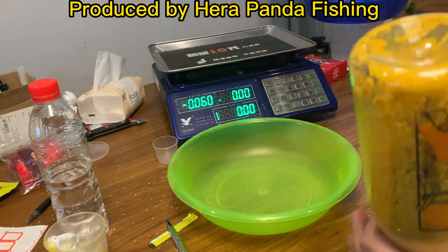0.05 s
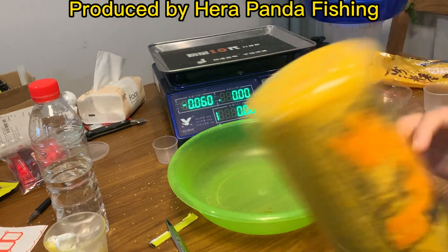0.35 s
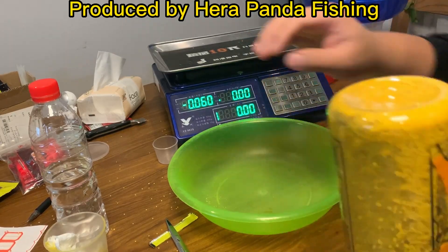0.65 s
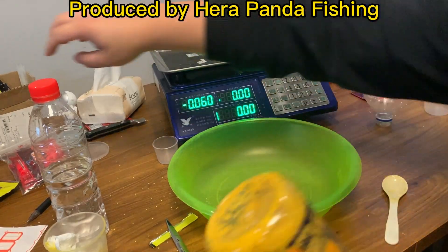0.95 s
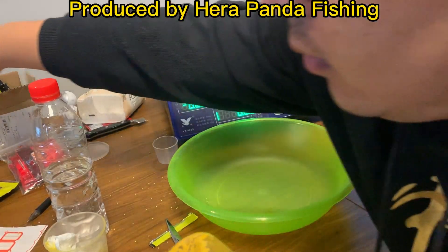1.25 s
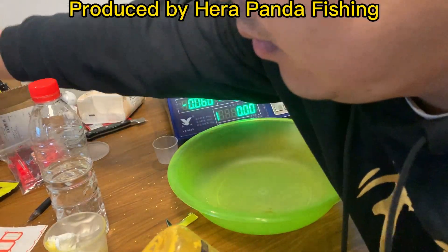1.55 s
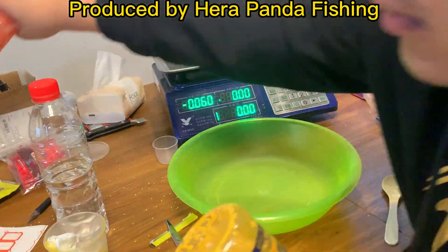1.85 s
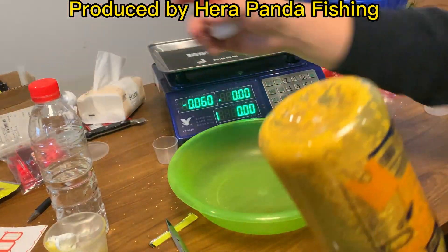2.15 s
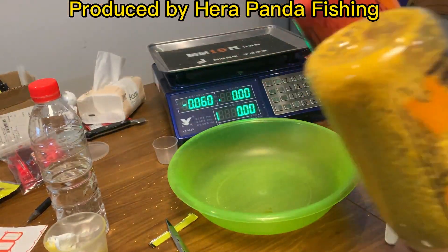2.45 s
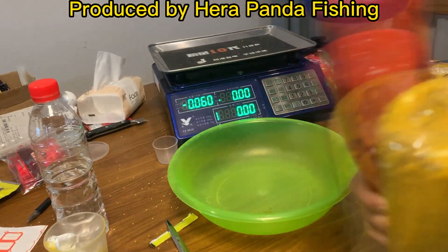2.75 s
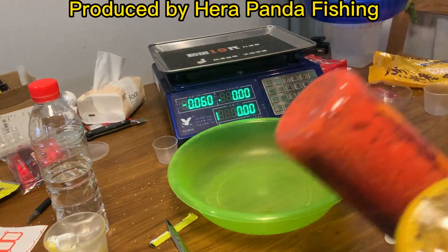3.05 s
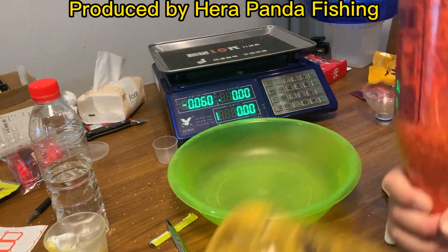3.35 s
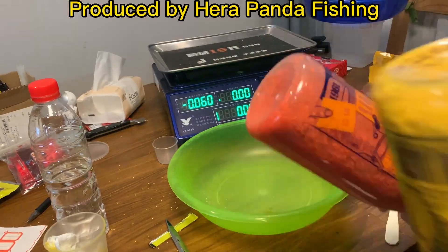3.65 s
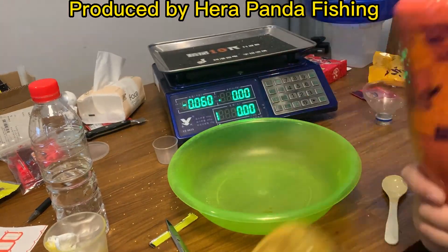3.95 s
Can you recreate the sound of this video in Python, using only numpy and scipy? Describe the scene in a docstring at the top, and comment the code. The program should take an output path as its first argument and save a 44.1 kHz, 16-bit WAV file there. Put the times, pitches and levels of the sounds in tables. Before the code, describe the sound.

Fine grain is shaken in plastic jars, swishing in quick strokes from about 0.3 to 1.1 seconds. A lull follows, with soft hand bumps and a sleeve rustle over faint room rumble. The swishing returns around 2.4 seconds, with a thump near 2.7. From 3.2 to 4 seconds the shaking is harder and closer, the packed grain landing in about a dozen loud, sharp, hollow knocks.

```python
"""Shaking jars of grain

Two plastic jars of fine grain are shaken by hand over a table in a small room. At first the grain
swishes from end to end in showers of tiny impacts; then a jar is shaken hard and the packed grain
lands in knocks of falling pitch that ring the jar. Between the shakes a sleeve rustles and a hand
bumps about, over a low room rumble."""
import sys
import numpy as np
from scipy import signal
from scipy.fft import rfft, irfft
from scipy.io import wavfile
from scipy.ndimage import uniform_filter1d

SR = 44100
rng = np.random.default_rng(int(sys.argv[2]) if len(sys.argv) > 2 else 0)


def output_pcm(signal):
    """Save a mono or channel-first signal as 16-bit PCM at the path in sys.argv[1].

    Samples are clipped to [-1, 1] before scaling.
    """
    pcm = np.clip(np.atleast_2d(signal).T, -1, 1) * 32767
    wavfile.write(sys.argv[1], SR, np.round(pcm).astype(np.int16))


N = 176400
T, HZ = np.arange(N) / SR, np.fft.rfftfreq(N, 1 / SR)


def amp(db):
    """Decibels to gain."""
    return 10 ** (np.asarray(db) / 20)


def unit(x):
    """Scales to rms 1."""
    return x / np.sqrt(np.mean(x ** 2) + 1e-20)


def curve(points, hz=HZ):
    """Reads breakpoints on a log-frequency axis."""
    f, value = np.transpose(points)
    return np.interp(np.log(hz + 1), np.log(f + 1), value)


def fader(points):
    """Gain over time from (t/s, level/dB) breakpoints."""
    return amp(np.interp(T, *np.transpose(points)))


def swell(at, half_width):
    """A bell-shaped envelope."""
    return np.exp(-np.minimum(((T - at) / half_width) ** 2, 50))


def pan(db):
    """Left and right gains, the left db above the right."""
    return amp(np.array([[db], [-db]]) / 2)


def band(hz, octaves):
    """The EQ curve of a soft resonance."""
    return 1 / (1 + (np.log2((HZ + 1) / hz) / octaves) ** 2) ** 2


def low_pass(x, hz):
    """A steep high cut."""
    taps = signal.firwin(201, hz, window=("kaiser", 8), fs=SR)
    return signal.oaconvolve(x, taps[None], "same")


def roll_off(x, hz):
    """A gentle high cut."""
    return irfft(rfft(x) / (1 + (HZ / hz) ** 4), N)


def wander(hz):
    """Random motion slower than about hz."""
    return unit(roll_off(rng.standard_normal(N), hz))


def noise():
    """Two unrelated white noises."""
    return rng.standard_normal((2, N))


def grains(per_second=8000, spread_db=0.3):
    """Two unrelated showers of tiny impacts of uneven size."""
    impacts = noise() * (rng.random((2, N)) < per_second / SR)
    return impacts * amp(spread_db * np.minimum(rng.exponential(1, (2, N)), 4))


def stereo(source, eq, coherence, lag_s=0):
    """Blends two unrelated signals into an equalised stereo image, the left side lag_s late."""
    a, b = rfft(source)
    shared = np.clip(curve(coherence), 0, 1)
    left = a * np.exp(-2j * np.pi * HZ * lag_s)
    right = shared * a + np.sqrt(1 - shared ** 2) * b
    return unit(irfft(np.array([left, right]) * eq, N))


# Fader rides of the rumble and of the soft room and handling noise: t/s, level/dB
RUMBLE_RIDE = [(0, -55), (.6, -52), (1.2, -49.5), (2.2, -52), (3.05, -55.5), (3.13, -82), (4, -102)]
AIR_RIDE = [(0, -62), (.6, -61), (1.3, -58.5), (1.95, -62), (2.3, -57.5), (2.9, -50.5), (3.3, -51),
            (4, -55.5)]
# Their tone: f/Hz, level/dB
RUMBLE_EQ = [(15, -7.5), (35, -31.5), (57, 6), (75, -9), (110, -7.5), (170, -8.5), (300, -22.5), (800, -69)]
AIR_EQ = [(60, -50), (170, 5), (350, 6.5), (600, 2), (1000, 0.5), (2000, -9), (4000, -16.5), (15000, -80)]
# Stereo image of room tone and handling: f/Hz, left-right coherence
BED_IMAGE = [(50, 0.99), (500, 0.58), (1500, 0.12), (5000, 0.1)]


def room_tone():
    """The bed: low rumble under soft room noise."""
    rumble = fader(RUMBLE_RIDE) * stereo(noise(), amp(curve(RUMBLE_EQ)), BED_IMAGE)
    air = fader(AIR_RIDE) * stereo(noise(), amp(curve(AIR_EQ)), BED_IMAGE)
    return rumble + air


# Decay of the small room: f/Hz, T60/s
REVERB_DECAY = [(100, 0.18), (700, 0.054), (3000, 0.17), (8000, 0.059), (16000, 0.19)]
# Reverb send EQ: f/Hz, level/dB
REVERB_EQ = [(100, -6), (700, -9.5), (2000, -10), (6000, -4), (15000, -40)]


def reverb(x):
    """The room's short diffuse tail, each band dying at its own speed."""
    hz, t, bands = signal.stft(rng.standard_normal((2, SR // 2)), SR, nperseg=256)
    decay = amp(-60 * t / curve(REVERB_DECAY, hz)[:, None])
    tail = signal.istft(bands * decay, SR, nperseg=256)[1]
    tail *= np.clip(np.arange(tail.shape[1]) / SR / 0.00037 - 1, 0, 1)  # pre-delay, then fade-in
    send = irfft(rfft(x) * amp(curve(REVERB_EQ)), N)
    return signal.fftconvolve(send, tail / np.linalg.norm(tail[0]), axes=1)[:, :N]


# Hum of the jar's hollow: t/s, level/dB
HUM_RIDE = [(0, -73), (2.55, -63.5), (2.8, -59.5), (3.3, -66), (4, -55.5)]
# Soft bumps of hand and arm: t/s, level/dB, half width/s, f/Hz, rustle/dB
HAND_BUMPS = [(1.258, -43, .027, 400, -48), (1.305, -48, .06, 280, -53), (1.65, -39, .036, 135, -59),
              (1.65, -46, .036, 420, -66), (2.075, -48, .026, 290, -55)]
# Tone of the sleeve: f/Hz, level/dB
SLEEVE_EQ = [(30, -43), (100, 10), (300, -7.5), (550, -5.5), (750, -6), (1200, -6), (2500, -12),
             (6000, -23.5), (15000, -33)]


def handling():
    """Dull bumps with a rustle of sleeve, over the faint hum of the held jar's hollow."""
    foley = fader(HUM_RIDE) * stereo(noise(), band(hz=287.2, octaves=0.034), BED_IMAGE)
    sleeve = stereo(grains(), amp(curve(SLEEVE_EQ)), BED_IMAGE)
    for at, db, width, hz, rustle_db in HAND_BUMPS:
        bump = stereo(noise(), band(hz, octaves=0.45), BED_IMAGE)
        foley += swell(at, width) * (amp(db) * bump + amp(rustle_db) * sleeve)
    return foley


# Thin whistles of powder: t/s, level/dB, half width/s, f/Hz, glide/(Hz/s)
POWDER_WHISTLES = [(1.143, -60.5, 0.11, 10700, -3000), (2.242, -67, 0.17, 10320, 1505.5)]


def powder_whistles():
    """Powder sliding in a tilted jar sings a narrow, gliding hiss."""
    hiss = np.zeros(N)
    for at, db, width, hz, glide in POWDER_WHISTLES:
        phase = 2 * np.pi * np.cumsum(hz + glide * (T - at)) / SR
        hiss += amp(db) * swell(at, width) * wander(hz=450) * np.sin(phase)
    return hiss


# Rubs on the plastic: t/s, level/dB, half width/s, f/Hz
PLASTIC_RUBS = [(.44, -38, .014, 2950), (.543, -37, .012, 4530), (.816, -42, .012, 1990),
                (1.89, -67, .06, 1012), (1.86, -76, .12, 1658)]


def plastic_rubs():
    """Rubbed plastic rings briefly on one narrow note."""
    return sum(amp(db) * swell(at, width) * wander(1 / width) * np.sin(2 * np.pi * hz * T)
               for at, db, width, hz in PLASTIC_RUBS)


def shifting_resonances(x, depth_db=2.2):
    """The jar's narrow resonances change at random from stroke to stroke."""
    bands = signal.stft(x, nperseg=512)[2]
    ripple = uniform_filter1d(rng.standard_normal(bands.shape[1:]), size=3, axis=0)  # across frequency
    ripple = uniform_filter1d(ripple, size=14, axis=1)  # across time
    return unit(signal.istft(bands * amp(depth_db * unit(ripple)), nperseg=512)[1][:, :N])


# Grain trickling as the jars tilt: t/s, level/dB
TRICKLE_RIDE = [(0, -63), (.12, -64), (.19, -73), (.33, -55.5), (.85, -57.5), (1.15, -63), (1.28, -65.5),
                (1.50, -86.5), (1.57, -74.5), (1.66, -70), (1.72, -75), (1.83, -73.5), (1.96, -87),
                (2.2, -64), (2.33, -64.5), (2.8, -46), (3.12, -59.5), (3.45, -58.5), (3.57, -61.5),
                (3.78, -62.5), (4, -56.5)]
# Loose grain sliding into the jar's end: t/s, level/dB, half width/s, low-mid boost/dB
GRAIN_SWISHES = [(.085, -57.5, 0.015, 10), (0.232, -53.5, 0.015, 1.5), (0.299, -52.5, 0.015, 7.5),
                 (0.348, -38, 0.014, -5), (0.368, -35, 0.0084, -6), (0.441, -28, 0.012, -3.5),
                 (0.539, -29, 0.0088, -3), (0.627, -28.5, 0.01, -2), (0.729, -32, 0.013, -1),
                 (0.78, -52, 0.0083, 19.5), (0.817, -31.5, 0.01, 1.5), (0.928, -36.5, 0.015, -2),
                 (1.05, -40, 0.011, 0), (1.749, -59, 0.0022, 8), (2.401, -52.5, 0.0092, 23),
                 (2.456, -46, 0.028, 12.5), (2.519, -35.5, 0.018, -2.5), (2.625, -34, 0.023, -13),
                 (2.702, -31, 0.026, -0.5), (2.804, -31, 0.012, -29), (2.886, -29.5, 0.017, -2.5),
                 (2.983, -31.5, 0.017, -13), (3.059, -34.5, 0.022, -5.5)]
# Clumps slapping the plastic: t/s, level/dB
CLUMP_SLAPS = [(0.22, -49.5), (.287, -48), (2.361, -50), (2.613, -29), (2.796, -30), (2.813, -23.5),
               (2.873, -34), (2.971, -29), (2.990, -41), (3.068, -24)]
# Tone of the shower: f/Hz, level/dB
SWISH_EQ = [(100, -66), (300, -5.5), (700, -6.5), (1400, -6), (2700, -2.5), (4500, 0.5), (8000, 2.5),
            (10500, -0.5), (13500, 2), (15700, -7)]
# Its stereo image: f/Hz, left-right coherence
SWISH_IMAGE = [(100, 0.9), (600, 0.58), (1500, 0.21), (6000, 0.32), (8500, 0.22), (11500, 0.9),
               (16000, 0.62)]


def swishes(gain_db=3.5, fade_db=-9.5, fade_s=0.045, slap_s=0.0031):
    """Showers of grain hit the plastic wall, each dying away in a short tail, with a thin trickle in between."""
    treble_power = fader(TRICKLE_RIDE) ** 2
    low_mid_power = treble_power.copy()
    for at, db, width, boost_db in GRAIN_SWISHES:
        onset = np.clip((T - at) / width, 0, 1)
        fade = amp(fade_db) * onset * np.exp(-abs(T - at) / fade_s)
        power = amp(db) ** 2 * (swell(at, width) ** 2 + fade ** 2)
        treble_power += power
        low_mid_power += power * amp(boost_db) ** 2
    for at, db in CLUMP_SLAPS:
        treble_power += (amp(db) * (T > at) * np.exp(-abs(T - at) / slap_s)) ** 2
    clumped = grains() * amp(0.3 * wander(hz=220))  # grain arrives in clumps
    shower = stereo(clumped, amp(curve(SWISH_EQ)), SWISH_IMAGE, lag_s=0.000298 * (HZ > 1800))
    shower = shifting_resonances(shower)
    low_mid = roll_off(shower, hz=2060)
    shaped = (shower - low_mid) * np.sqrt(treble_power) + low_mid * np.sqrt(low_mid_power)
    return amp(gain_db) * pan(db=-1) * shaped


# Dry rattles as the hard shaking starts: t/s, level/dB
LEAD_IN_RATTLES = [(3.127, -39), (3.149, -44), (3.165, -37), (3.186, -45), (3.203, -42), (3.225, -46)]
# Their tone: f/Hz, level/dB
RATTLE_EQ = [(2000, -3.5), (13500, 1.5)]
# Stereo image of rattles and cracks: f/Hz, left-right coherence
IMPACT_IMAGE = [(100, 0.95), (3000, 0.84), (4500, 0.62), (7500, 0.57), (16000, 0.38)]


def rattles(gain_db=2, rebound_s=0.032, rebound_db=-23.5):
    """Loose grain sprays ahead of the hard shaking and falls back after each knock."""
    rebounds = [(at + rebound_s, crack_db + rebound_db) for at, *_, crack_db, _, _ in GRAIN_KNOCKS]
    envelope = sum(amp(db) * swell(at, half_width=0.0037) for at, db in [*LEAD_IN_RATTLES, *rebounds])
    spray = stereo(grains(), amp(curve(RATTLE_EQ)), IMPACT_IMAGE, lag_s=0.000012)
    return amp(gain_db) * envelope * spray


# Tone of a knock's crack: f/Hz, level/dB
CRACK_EQ = [(300, -11), (1200, 9.5), (1900, 3), (2800, 3.5), (3800, 6), (4600, 7.5), (6500, 4.5), (8000, 6),
            (14500, 5.5), (16500, -9.5)]


def cracks(delay_s=0.0005, snap_db=-3, wall_ring_db=-15.5, wall_ring_s=0.011):
    """The bright edge of each knock: the first grains snap on the wall, the rest crack, and the wall rings
    briefly on."""
    envelope = np.zeros(N)
    for at, *_, crack_db, _, _ in GRAIN_KNOCKS:
        hit = at + delay_s
        snap = amp(snap_db) * swell(hit, half_width=0.000092)
        burst = swell(hit, half_width=0.0025)
        wall_ring = amp(wall_ring_db) * np.exp(-np.maximum(T - at, 0) / wall_ring_s)
        envelope += amp(crack_db) * (T > hit) * (snap + burst + wall_ring)
    return envelope * stereo(noise(), amp(curve(CRACK_EQ)), IMPACT_IMAGE, lag_s=0.000012)


# Modes of the plastic jar: f/Hz, level/dB, T60/s
JAR_MODES = [(691.4, -4, 0.13), (719, -4, 0.084), (956, -1.5, 0.081), (1036, 2.5, 0.029),
             (1270, -2.5, 0.058), (1430, -10.5, 0.071), (1888, -3.5, 0.077), (2650, -19, .07)]


def jar_ring(drive, gain_db=-54):
    """The struck jar rings on in its damped modes."""
    t = T[:SR // 3]
    modes = sum(amp(db - 60 * t / t60) * np.sin(2 * np.pi * hz * t) for hz, db, t60 in JAR_MODES)
    return amp(gain_db) * signal.fftconvolve(drive, modes)[:N]


# Packed grain landing: t/s, level/dB, f/Hz at the crest, attack/s, decay/s,
# crack/dB, ring send/dB, recoil/dB
GRAIN_KNOCKS = [(.5437, -34.5, 238, 0.0057, 0.02, -55, -17, -49),
                (2.6744, -15, 320, 0.0045, 0.0076, -28.5, -30, -38),
                (2.726, -24, 422, 0.0044, 0.002, -31.5, -2, -33),
                (3.2452, -16, 880, .0018, 0.0012, -25, 11, -60),
                (3.3, -11.5, 865, 0.0016, 0.0013, -21.5, 9, -49),
                (3.3496, -17, 411, 0.0051, .0005, -21.5, 7, -52),
                (3.4014, -11, 392, 0.00495, 0.00028, -21, 1, -45),
                (3.455, -11, 418.4, 0.0046, 0.00028, -23, 1, -33),
                (3.51, -3.5, 1880, 0.00066, 0.0015, -24, 8, -48),
                (3.605, -14.5, 390, 0.005, 0.001, -24.5, 7, -61),
                (3.6612, -12, 620, 0.00314, 0.0017, -21, 11.5, -62),
                (3.7316, -15.5, 1870, 0.00071, 0.00056, -24, 12, -62),
                (3.8615, -19.5, 596, 0.0032, 0.0012, -22.5, 10.5, -76),
                (3.9136, -12.5, 683, 0.0029, 0.0012, -23.5, 7.5, -45),
                (3.9674, -9, 557, 0.0025, 0.00059, -22, 5, -35)]


def knocks(contact_hz=5980, recoil_periods=0.93, lag_s=0.00006):
    """Grain piles against the jar's end: the deepening layer sounds a falling note and rings the jar."""
    thud, drive = np.zeros((2, N))
    for at, db, crest_hz, attack_s, decay_s, _, ring_db, recoil_db in GRAIN_KNOCKS:
        t = np.maximum(T - at, 0)
        pitch = contact_hz / (1 + (contact_hz / crest_hz - 1) * t / attack_s)  # thin layer, high note
        phase = 2 * np.pi * np.cumsum(pitch * (t > 0)) / SR
        attack = np.minimum(t / attack_s, 1) ** 0.6
        decay = np.exp(-np.minimum(np.maximum(t - attack_s, 0) / decay_s, 10) ** 1.04)
        note = -amp(db) * attack * decay * np.sin(phase)
        swing = t * crest_hz / recoil_periods  # progress of the jar's recoil
        recoil = amp(recoil_db) * swing * (2 - swing) * np.exp(-np.minimum(swing, 60))
        thud += note + recoil
        drive += note * amp(ring_db)
    body = thud + jar_ring(drive)
    late_left = np.interp(T - lag_s, T, body)
    return pan(db=-0.3) * (np.array([late_left, body]) + cracks())


def scene(high_cut_hz=16000, hard_send_db=-8.5):
    """The mix of jars, hands and room; the hard shaking is nearer, so drier."""
    soft = low_pass(swishes() + powder_whistles() + plastic_rubs(), high_cut_hz) + handling()
    hard = knocks() + low_pass(rattles(), high_cut_hz)
    wet = low_pass(reverb(soft + amp(hard_send_db) * hard), high_cut_hz)
    return soft + hard + wet + room_tone()


def record(dry):
    """A high cut on the master."""
    return low_pass(dry, hz=17000)


dry = scene()
out = record(dry)
output_pcm(out)
```